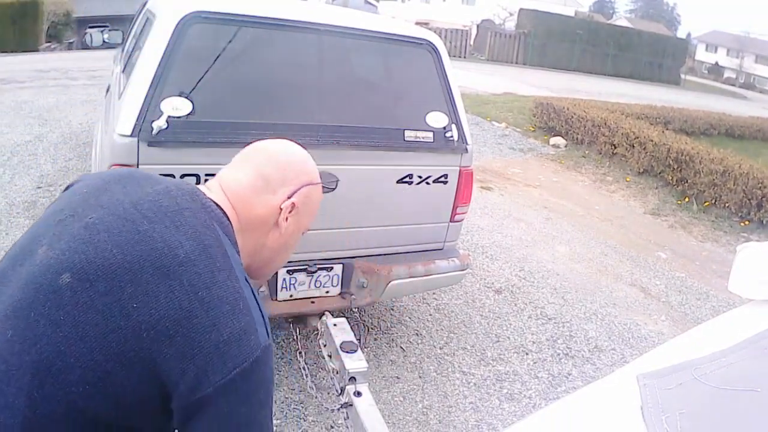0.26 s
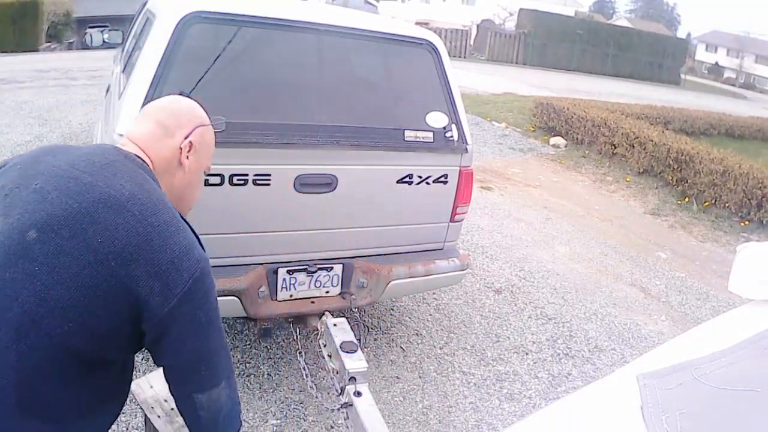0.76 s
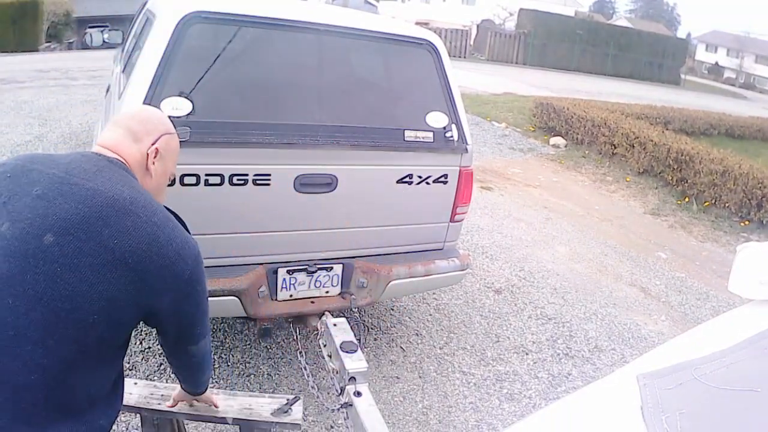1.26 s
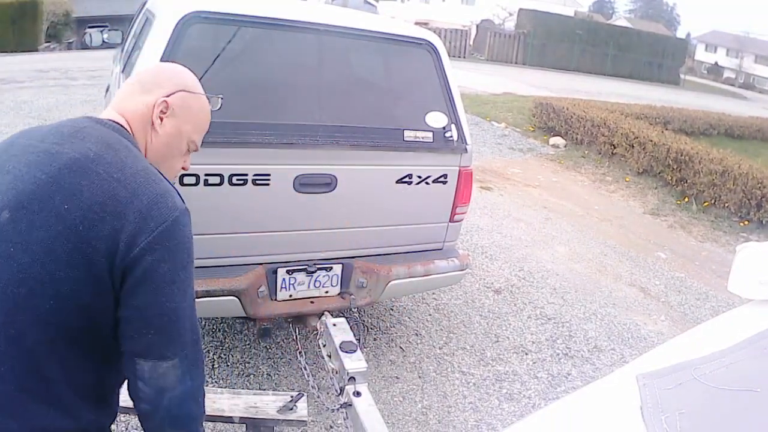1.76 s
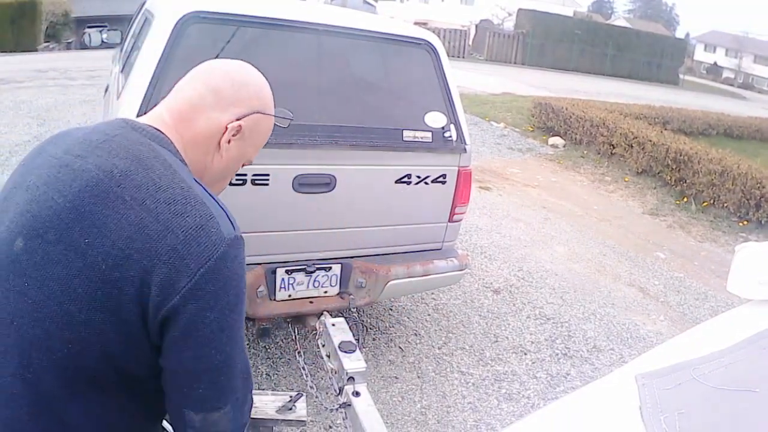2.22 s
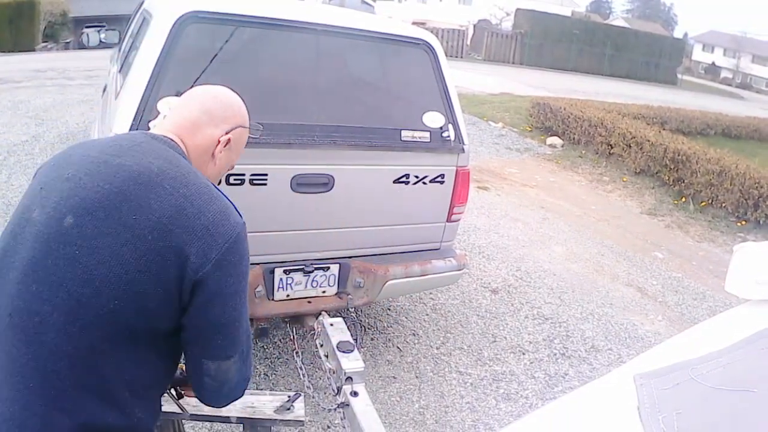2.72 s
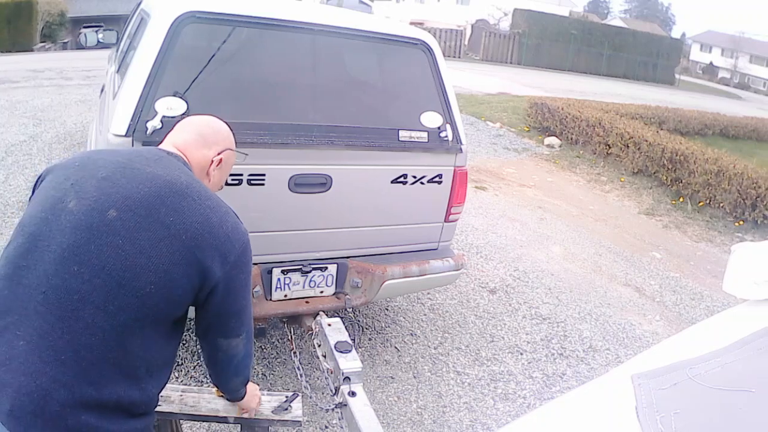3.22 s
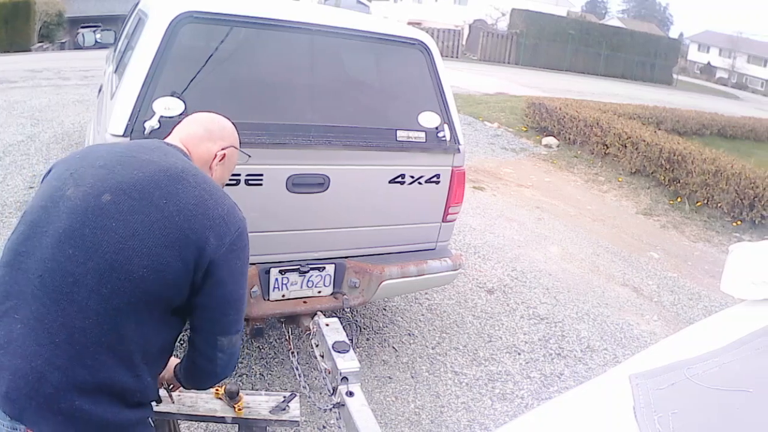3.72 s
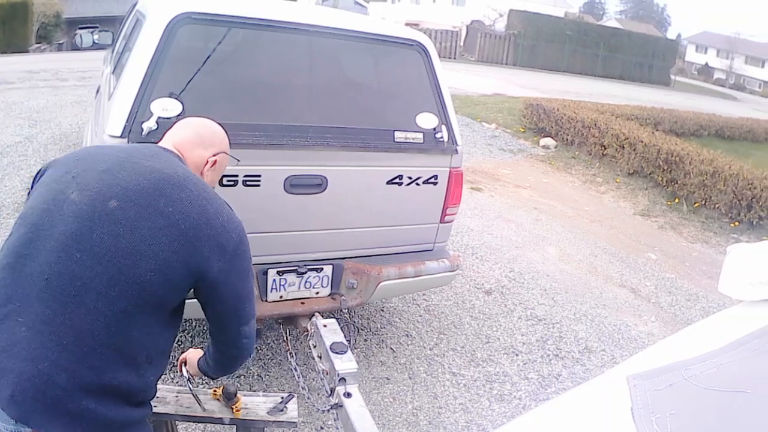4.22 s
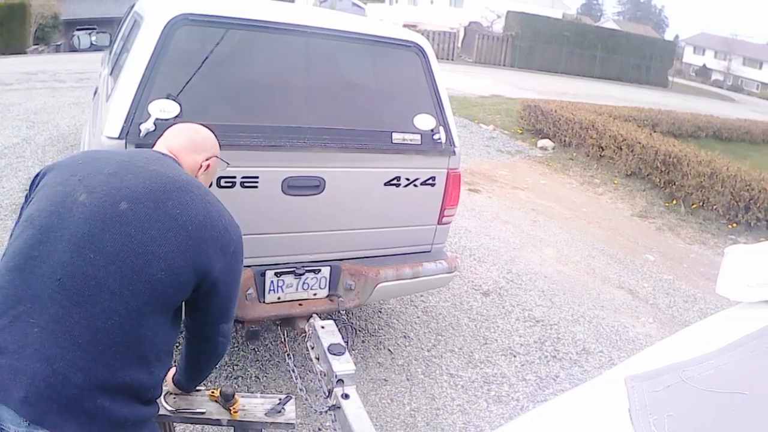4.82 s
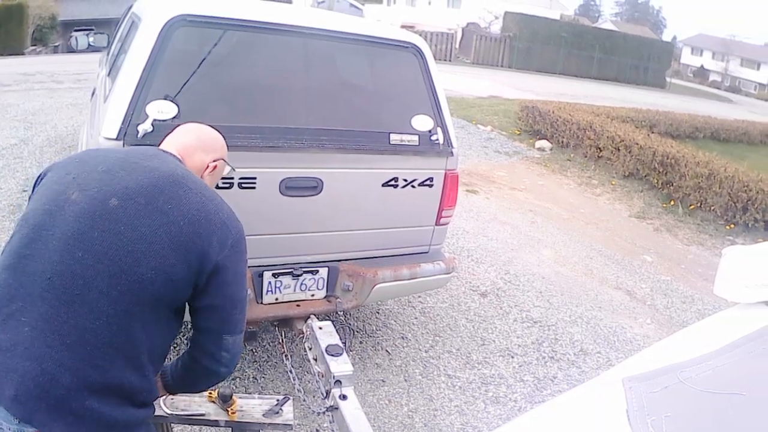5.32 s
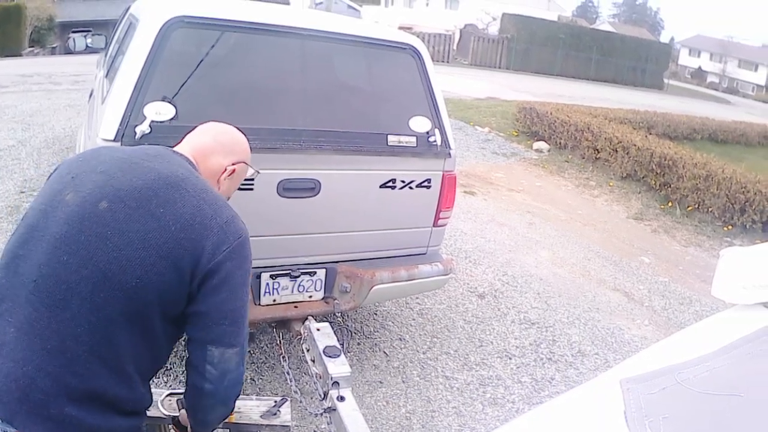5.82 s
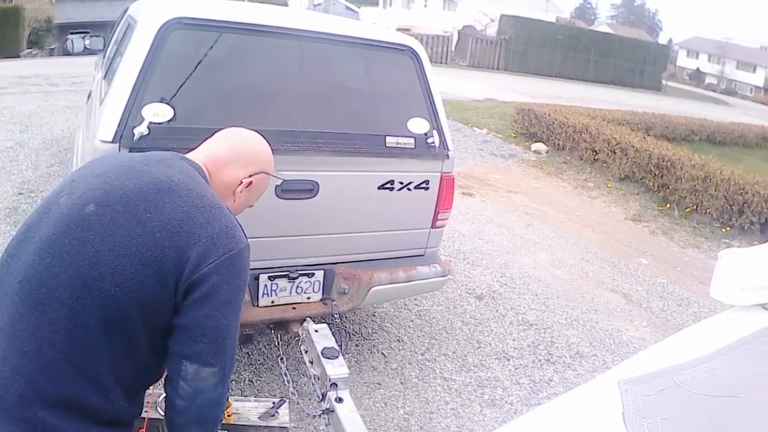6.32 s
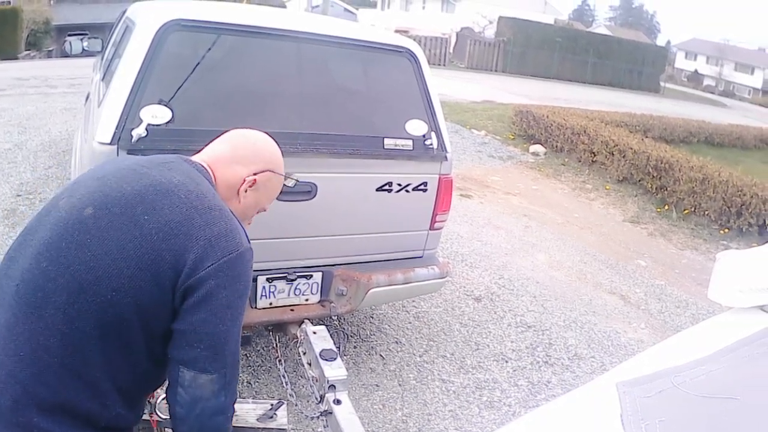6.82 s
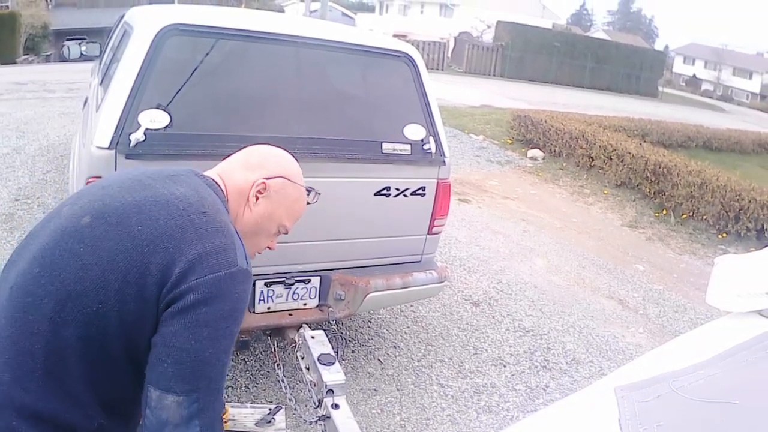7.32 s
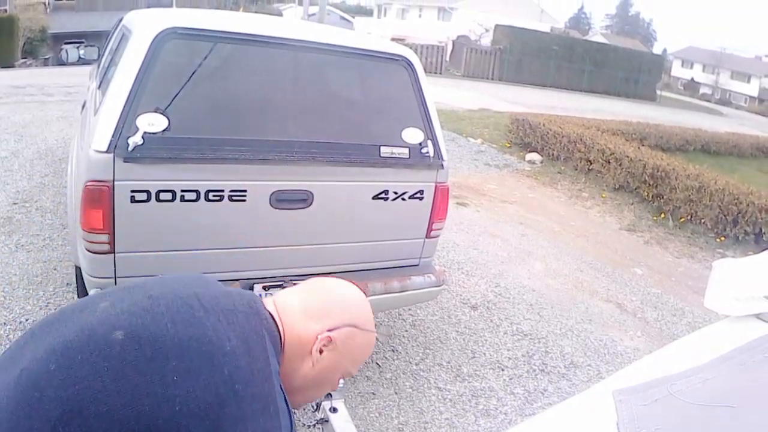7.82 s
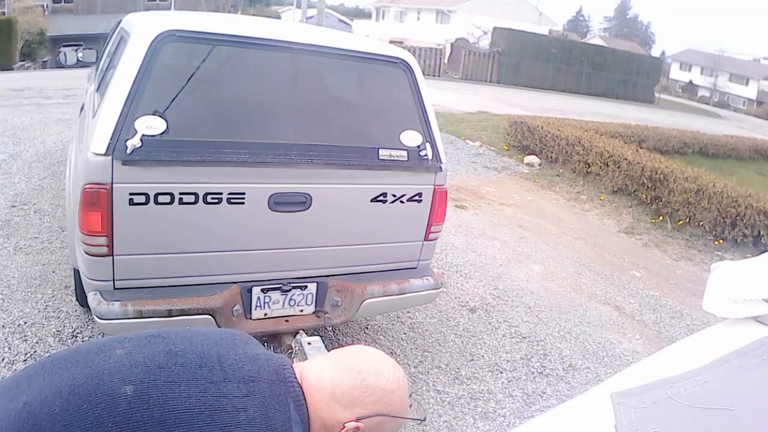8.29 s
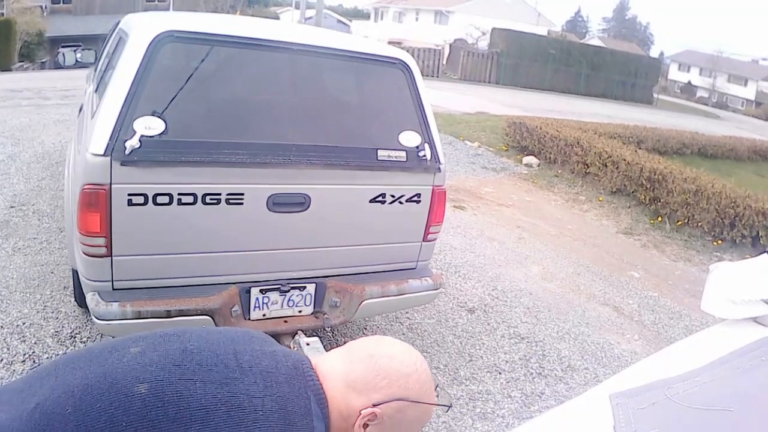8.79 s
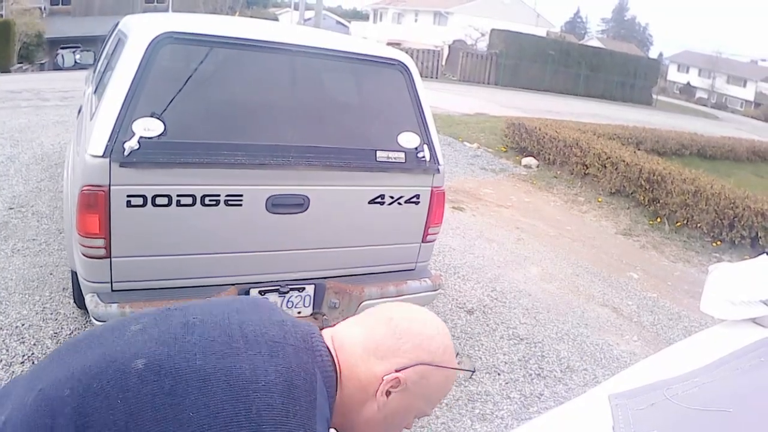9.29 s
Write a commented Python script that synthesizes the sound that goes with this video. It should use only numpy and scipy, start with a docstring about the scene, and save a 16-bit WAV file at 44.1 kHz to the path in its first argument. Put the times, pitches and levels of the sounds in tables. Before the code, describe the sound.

A man works with trailer hitch parts, heard close by on a small microphone. Woody steel knocks come in irregular clusters, with gravel drags, cloth rustle and soft footfalls between them. The hardest knock distorts midway; afterwards it is mostly quiet until a muffled chain clank and boom, then a crisp, loud coupler clank near the end. Short yard echoes, soft air hush and a distant engine fill the background.

```python
"""A gravel driveway, where a man hitches a trailer to a pickup.
Steel knocks ring the modes of a wooden trestle; the coupler and chains clank as grain noise through frame resonances.
The hitch booms and loose steel rings and tinks as modes and grains; scuffs and clothes rustle as shaped noise.
A far engine hums as two sines over a noise hush; near sounds echo off the yard.
The electronics add a faint pulsing whine, and the hardest knock overloads."""
import sys
import numpy as np
from scipy import signal
from scipy.fft import rfft, irfft
from scipy.io import wavfile
from scipy.ndimage import uniform_filter1d

SR = 44100
rng = np.random.default_rng(int(sys.argv[2]) if len(sys.argv) > 2 else 0)


def dump(signal):
    """Clip the signal to [-1, 1] and save it as 16-bit WAV at the path in sys.argv[1]."""
    limited = np.clip(np.atleast_2d(signal).T, -1, 1)
    pcm = np.round(limited * 32767).astype(np.int16)
    wavfile.write(sys.argv[1], SR, pcm)


N = 421155
TIME = np.arange(N) / SR
SHORT = TIME[:SR]  # one second: the life of one event


def from_db(db):
    """Decibels to gain."""
    return 10 ** (np.asarray(db) / 20)


def rms_one(x):
    """Scale to unit power."""
    return x / np.sqrt(np.mean(x ** 2) + 1e-20)


def at_hz(points, hz):
    """Read a spectrum on a log-frequency axis."""
    points = np.array(points)
    return np.interp(np.log(hz), np.log(points[:, 0]), points[:, 1])


def bins(x):
    """Frequencies of the spectrum of x, in Hz."""
    return np.maximum(np.fft.rfftfreq(len(x), 1 / SR), 1)


def coloured(x, spectrum):
    """EQ a noise to a spectrum; rms 1."""
    gain = from_db(at_hz(spectrum, bins(x)))
    return rms_one(irfft(rfft(x) * gain, len(x)))


def split(x, centres):
    """Overlapping bands that sum to x."""
    whole, log_hz = rfft(x), np.log(bins(x))
    bands = []
    for pick in np.eye(len(centres)):
        weight = np.interp(log_hz, np.log(centres), pick)
        bands.append(irfft(whole * weight, len(x)))
    return bands


def fade(t60):
    """Exponential decay that loses 60 dB in t60 seconds."""
    return from_db(-60 * SHORT / max(t60, 1e-3))


def swell(at, up, down):
    """A smooth rise to 1 and a smooth fall."""
    return np.exp(-((TIME - at) / np.where(TIME < at, up, down)) ** 2)


def add(out, s, sound):
    """Mix a sound in at a time in seconds."""
    start = max(round(s * SR), 0)
    out[start:start + len(sound)] += sound[:max(N - start, 0)]


def grains(spread_db):
    """A dense run of tiny contacts, a few much harder than the rest."""
    per_s = 4000  # mean density
    sizes = from_db(spread_db * np.minimum(rng.exponential(1, SR), 4))
    signs = rng.choice([-1, 1], SR)
    return sizes * signs * (rng.random(SR) < per_s / SR)


def struck(modes, favoured_hz, focus_db, octaves, length):
    """Modes ring together, neighbours in opposite sense; the place of the blow favours those near one pitch."""
    out = 0
    for k, (hz, db, t60) in enumerate(modes):
        nearness = np.exp(-(np.log2(hz / favoured_hz) / octaves) ** 2)
        level = (-1) ** k * from_db(db + focus_db * nearness)
        out = out + level * fade(t60 * length) * np.sin(2 * np.pi * hz * SHORT)
    return out / np.abs(out).max()


def burst(source, rise, t60, darkening):
    """Contacts of rms 1 swell and die away, the highs sooner than the lows; t60 holds at 1 kHz."""
    centres = np.geomspace(125, 8000, num=4)
    rise = max(rise, 1e-4)
    attack = np.minimum(SHORT / rise, 1)
    after = np.maximum(SHORT - rise, 0)
    lives = max(t60, .01) * (centres / 1000) ** -darkening
    bands = split(source, centres)
    return attack * sum(band * np.exp(-np.log(1000) * after / life) for band, life in zip(bands, lives))


def shelved(spectrum, bass_db, treble_db):
    """Tilt a colour with a bass shelf below 800 Hz and a treble shelf above 1200 Hz."""
    hinges = np.log([250, 800, 1200, 3500])
    shelf = [bass_db, 0, 0, treble_db]
    return [(hz, db + np.interp(np.log(hz), hinges, shelf)) for hz, db in spectrum]


# steel set down on wood, and its bounces:
# [t/s, peak level/dB, favoured f/Hz, contact cut-off f/Hz, rattle level against the ring/dB]
KNOCK_HITS = [(.149, -29.5, 530, 500, -16), (.2885, -32.5, 910, 1290, -4), (.4105, -26.5, 795, 1180, -9),
              (.419, -31, 866, 1000, -6), (1.101, -41.5, 1000, 1800, -1), (1.229, -15.5, 1000, 3970, -22),
              (1.377, -29, 1050, 1300, -16), (2.505, -31.5, 900, 2020, -3), (3.165, -19.5, 560, 990, -6),
              (3.3487, -8.5, 1110, 1710, -11), (3.386, -27.5, 820, 500, -17), (4.207, -29.5, 456, 740, -11),
              (4.22, -35.5, 1090, 550, -26), (4.358, -46.5, 795, 600, -11), (4.53, -36, 620, 900, -13),
              (4.772, -45, 1110, 1200, -9), (4.876, 3, 850, 3000, -14), (4.927, -21, 754, 600, -26.5),
              (4.9455, -9.5, 1200, 1200, -25), (4.9785, -19, 1090, 1380, -25),
              (6.032, -30.5, 1080, 4000, -2), (7.493, -39.5, 1150, 900, 0), (7.821, -40, 850, 1000, 5)]
# modes of steel and trestle ringing free, before focus and damping: [f/Hz, level/dB, t60/s]
TRESTLE_MODES = [(287, -29, .09), (493, -18, 0.047), (558.3, -12.5, 0.02), (580, -40, 0.61), (732, -4, .05),
                 (757, -9, .12), (848, -15, .06), (991, -1, .06), (1085, -6, .04), (1132, -5, .06),
                 (1155, -18, .03), (1180, -5, .06), (1345, -10, .045), (1432, -12, .07), (1550, -11, .05),
                 (1755, -13, .07), (1885, -11, .08), (2070, -13, .06), (2235, -17, .05),
                 (2318, -17.5, 0.074), (2730, -14.5, 0.057), (2930, -19.5, .04), (3520, -18.5, 0.054),
                 (3473, -31.5, .05), (5130, -28, 0.016), (7450, -33, .015)]
# colour of the rattle: [f/Hz, level/dB]
RATTLE_SPECTRUM = [(60, -25.5), (250, -15), (700, 7), (1500, 7), (2200, -11.5), (3600, -2), (5000, -10.5),
                   (12000, -17)]
# the softer the contact, the more one pitch stands out
FOCUS_DB, FOCUS_CONTACT_HZ, FOCUS_DB_PER_OCTAVE = 15, 1090, 9.5
KNOCK_RING = .73  # share of the free ring time that is left under the hand


def knocks(radiating_hz=230):
    """Each blow rings the trestle and rattles briefly; a soft contact dulls both and singles out one pitch."""
    out = np.zeros(N)
    ground_s, ground_db = .005, -12
    no_bass = signal.butter(3, radiating_hz, "high", fs=SR, output="sos")  # small parts radiate little bass
    for s, db, favoured_hz, contact_hz, rattle_db in KNOCK_HITS:
        focus_db = FOCUS_DB - FOCUS_DB_PER_OCTAVE * np.log2(contact_hz / FOCUS_CONTACT_HZ)
        ring = struck(TRESTLE_MODES, favoured_hz, focus_db, octaves=0.41, length=KNOCK_RING)
        chatter = coloured(grains(2.8), RATTLE_SPECTRUM)
        rattle = burst(chatter, rise=0.00094, t60=0.04, darkening=0.41)
        contact = signal.butter(1, np.clip(contact_hz, 100, 15000), fs=SR, output="sos")
        blow = signal.sosfilt(np.vstack([contact, no_bass]), ring + from_db(rattle_db) * rattle)
        ground_echo = np.interp(SHORT - ground_s, SHORT, blow, left=0)
        blow = blow + from_db(ground_db) * ground_echo
        add(out, s, from_db(db) * blow / np.abs(blow).max())
    return out


# coupler, chain and frame clanking: [t/s, rms level/dB, t60/s, treble shelf level/dB]
CLANK_HITS = [(1.217, -28.5, 0.097, -11), (1.2245, -17, 0.067, -7), (1.279, -26.5, 0.15, -9),
              (1.318, -43.5, 0.41, -2), (1.362, -44, 0.64, -3.5), (1.502, -45.5, 0.34, -10),
              (8.305, -43.5, 0.3, -23), (8.448, -29, 0.29, -19.5), (8.48, -38.5, 0.56, -32),
              (8.961, -44, .18, -4), (9.483, -31, 0.055, 2), (9.4877, -12.5, 0.089, 1.5),
              (9.4963, -10.5, .065, 4), (9.502, -19, 0.66, -9.5), (9.521, -15.5, 0.045, -12.5)]
# colour of a clank before its shelves: [f/Hz, level/dB]
CLANK_SPECTRUM = [(40, -27), (100, -14), (250, -12), (450, -10), (700, -2.5), (1000, -2), (1700, 2.5),
                  (2300, -6), (3500, -10.5), (4500, -15.5), (7000, -20), (12000, -27)]
# resonances of the trailer frame, a dip where below 0 dB: [f/Hz, width/Hz, level/dB]
FRAME_RESONANCES = [(335, 16, 2.5), (513, 49, 5.5), (685, 31, 8.5), (932, 7.3, 7.5), (1056, 21, 6),
                    (1310, 96, 3), (1750, 66, -26), (2678, 83, 7.5), (3460, 34, 14), (5330, 29, 15.5)]
CLANK_RISE_S, RISE_DOUBLES_DB = 0.0024, 26  # rise at 0 dB treble; it doubles per 26 dB duller
# bass at 0 dB level and treble; it grows with force and falls with hardness (dB per dB)
CLANK_BASS_DB, BASS_PER_LEVEL, BASS_PER_TREBLE = 7.5, 0.36, 0.78


def clanks():
    """Loose steel chatters in a quick burst that excites the resonances of the frame."""
    out, hz = np.zeros(N), bins(SHORT)
    frame = 1 + sum((from_db(db) - 1) / (1 + 2j * (hz - centre) / width)
                    for centre, width, db in FRAME_RESONANCES)
    for s, db, t60, treble_db in CLANK_HITS:
        bass_db = CLANK_BASS_DB + BASS_PER_LEVEL * db - BASS_PER_TREBLE * treble_db
        rise = CLANK_RISE_S * 2 ** (-treble_db / RISE_DOUBLES_DB)
        resonant = irfft(rfft(grains(3.84)) * frame)
        chatter = coloured(resonant, shelved(CLANK_SPECTRUM, bass_db, treble_db))
        add(out, s, from_db(db) * burst(chatter, rise, t60, darkening=0.32))
    return out


# the hitch is jolted and booms: [t/s, peak level/dB]
HITCH_JOLTS = [(8.456, -24.5), (9.491, -40)]
# modes of the hitch, before focus and shortening: [f/Hz, level/dB, t60/s]
HITCH_MODES = [(83, -1, 0.65), (251.3, -2, 0.41), (338, -0.5, 0.53), (905, 6, 0.18), (1780, -12, 0.13)]


def booms():
    """A heavy jolt sets the long, low modes of the hitch ringing."""
    out = np.zeros(N)
    for s, db in HITCH_JOLTS:
        boom = struck(HITCH_MODES, favoured_hz=335, focus_db=4.5, octaves=.5, length=0.86)
        add(out, s, from_db(db) * boom)
    return out


# thin high rings of loose steel, touched lightly or jarred by a hard knock:
# [t/s, peak level/dB, favoured f/Hz, ring length as a multiple]
STEEL_RINGS = [(2.802, -45, 4130, 1.6), (2.885, -56, 2300, 5.6), (3.924, -40, 2300, 0.66),
               (4.876, -40, 4200, 0.74)]
# modes of the loose steel, before focus and ring length: [f/Hz, level/dB, t60/s]
STEEL_MODES = [(2035, -9, .15), (2200, 0, .12), (4645, -3, .19), (5286, -6, .08)]
# small metallic tinks, ticks and jingles of loose steel: [t/s, rms level/dB, t60/s, pitch f/Hz]
STEEL_TINKS = [(1.33, -42.5, 0.48, 1030), (1.375, -48, 0.14, 3720), (1.401, -48, 0.061, 4500),
               (1.474, -39, 0.062, 1167), (2.538, -44, 0.074, 4240), (2.801, -43, 0.064, 2000),
               (4.9, -33, 0.19, 2250), (4.95, -47, 0.32, 2090), (6.914, -40, .11, 1470),
               (6.915, -46, .07, 2450), (8.368, -42.5, 0.033, 1740), (8.45, -46.5, 0.15, 2700),
               (8.962, -47, 0.093, 1890), (8.98, -49.5, 0.25, 1410)]
# colour of the tinks: [f as a multiple of the pitch, level/dB]
TINK_SPECTRUM = [(.15, -40), (.6, 0.5), (.85, -0.5), (1.049, 7), (1.3, -15), (1.8, -19.5), (4.001, -44.5)]
TINK_RISE_SHARE = .035  # of the decay time


def loose_steel():
    """Loose steel rings thinly in a few high modes, and tinks, ticks and jingles as grains around a pitch."""
    out = np.zeros(N)
    for s, db, favoured_hz, length in STEEL_RINGS:
        ring = struck(STEEL_MODES, favoured_hz, focus_db=13.5, octaves=0.36, length=length)
        add(out, s, from_db(db) * ring)
    for s, db, t60, hz in STEEL_TINKS:
        tink = coloured(grains(3.0), np.array(TINK_SPECTRUM) * [hz, 1])
        add(out, s, from_db(db) * burst(tink, TINK_RISE_SHARE * t60, t60, darkening=0.2007))
    return out


# colour shared by drags and scuffs, before its shelves: [f/Hz, level/dB]
SCUFF_SPECTRUM = [(60, -32), (200, -13.5), (500, 4), (950, 7), (1400, 2), (2300, -10.5), (3600, -12.5),
                  (5000, -27), (12000, -31)]


def grinding(rise, t60, bass_db, treble_db):
    """Rough surfaces grind under a load: widely uneven grains in one burst."""
    contacts = coloured(grains(5.0), shelved(SCUFF_SPECTRUM, bass_db, treble_db))
    return burst(contacts, rise, t60, darkening=0.034)


# shoes and wood drag over the gravel: [t/s, rms level/dB, t60/s, treble shelf level/dB]
GRAVEL_DRAGS = [(.083, -43.5, 0.34, -3), (.132, -42, 0.12, -7), (0.319, -40.5, 0.58, -5.5),
                (.393, -34.5, 0.11, -26), (0.651, -47.5, 0.22, -1), (1.674, -49, 0.27, -5),
                (1.912, -46.5, 0.23, -4), (2.434, -46.5, .3, -3)]
# crunches of grit, and scuffs of steel handled on the trestle; some die quickly, some linger:
# [t/s, rms level/dB, t60/s]
SCUFF_HITS = [(.197, -46.5, 0.055), (1.155, -51.5, 0.84), (1.628, -48.5, 0.4), (2.045, -51.5, 1),
              (2.134, -49, .2), (2.171, -51, 0.3), (2.672, -39.5, .14), (2.721, -41, 0.088),
              (2.824, -43.5, 0.23), (2.969, -42, 0.05), (6.011, -46.5, 0.11), (6.069, -50, 0.22),
              (6.18, -49.5, 0.083), (6.26, -54, .1), (6.84, -52.5, 0.23), (7.412, -43.5, 0.15),
              (7.533, -50, .17), (7.571, -45, 0.037), (7.629, -49.5, 0.19), (7.662, -50, 0.17),
              (9.295, -47, 0.2)]
# soft footfalls: [t/s, rms level/dB, t60/s]
FOOT_THUDS = [(2.226, -45.5, 0.11), (2.285, -45, 0.16), (2.53, -54, 0.073), (2.655, -51, 0.065),
              (7.196, -40, 0.13), (7.392, -41, 0.24), (8.454, -42.5, 0.59)]
# colour of a footfall: [f/Hz, level/dB]
THUD_SPECTRUM = [(25, -6), (50, 1.5), (100, 0.5), (230, -6.5), (330, -12), (600, -44), (3000, -60)]
DRAG_RISE_S, DRAG_BASS_DB = 0.021, 5.5
SCUFF_RISE_S, SCUFF_BASS_DB, SCUFF_TREBLE_DB = 0.0029, -2.5, 0.5
THUD_RISE_S = 0.0046


def scuffs_and_steps():
    """Drags swell slowly, grit and handled steel scuff almost at once, and footfalls land with a dull thud."""
    out = np.zeros(N)
    for s, db, t60, treble_db in GRAVEL_DRAGS:
        add(out, s, from_db(db) * grinding(DRAG_RISE_S, t60, DRAG_BASS_DB, treble_db))
    for s, db, t60 in SCUFF_HITS:
        add(out, s, from_db(db) * grinding(SCUFF_RISE_S, t60, SCUFF_BASS_DB, SCUFF_TREBLE_DB))
    for s, db, t60 in FOOT_THUDS:
        footfall = coloured(rng.standard_normal(SR), THUD_SPECTRUM)
        add(out, s, from_db(db) * burst(footfall, THUD_RISE_S, t60, darkening=0.18))
    return out


# the man bends, reaches or straightens up: [t/s at the height of the move, level/dB, swell/s, ebb/s]
BODY_MOVES = [(.6, -60, 1, 0.28), (1.71, -56, 0.14, .05), (1.95, -55.5, 0.028, 0.097),
              (2.54, -47, 0.17, 0.2), (3.15, -62.5, 0.43, .3), (6.3, -66.5, .08, .15),
              (7.55, -56, 0.24, 0.16), (8.4, -53.5, 0.11, 0.21), (8.86, -57, 0.3, 0.17),
              (9.36, -54.5, 0.12, 0.12)]
# colour of the cloth: [f/Hz, level/dB]
CLOTH_SPECTRUM = [(25, -22.5), (60, -3), (180, 1.5), (300, -1), (600, -10), (1500, -15.5), (4000, -34.5),
                  (12000, -51.5)]
STILL_DB = -67.5  # his clothes while he works on the spot


def rustle(flutter_db=3.0):
    """Cloth rubs unevenly, swelling and ebbing with each move of the man."""
    power = from_db(STILL_DB) ** 2
    for s, db, up, down in BODY_MOVES:
        power = power + (from_db(db) * swell(s, up, down)) ** 2
    flutter = rms_one(uniform_filter1d(rng.standard_normal(N), size=700))
    cloth = coloured(rng.standard_normal(N), CLOTH_SPECTRUM)
    return np.sqrt(power) * from_db(flutter_db * flutter) * cloth


# colour of the outdoor hush: [f/Hz, level/dB per Hz]
HUSH_SPECTRUM = [(25, -13), (50, -7.5), (100, -4), (240, -3), (450, -6), (850, -3.5), (1250, -10.5),
                 (2000, -18), (3200, -20.5), (5000, -23), (12500, -24)]
HUSH_DB = -58.5  # rms
# the engine idles and speeds up once; level follows speed
IDLE_HZ, IDLE_DB = 101.8, -68.5
REV_AT_S, REV_UP_S, REV_DOWN_S, REV_HZ, ENGINE_DB_PER_HZ = 5.4, 0.97, 2.1, 5.4, 0.97


def distance(octave_db=-8, unsteady=.005):
    """The wavering firing note of a far engine and its octave, over the steady outdoor hush."""
    faster_hz = REV_HZ * swell(REV_AT_S, REV_UP_S, REV_DOWN_S)
    waver = rms_one(uniform_filter1d(rng.standard_normal(N), size=4000))
    phase = 2 * np.pi * np.cumsum((IDLE_HZ + faster_hz) * (1 + unsteady * waver)) / SR
    note = np.sin(phase) + from_db(octave_db) * np.sin(2 * phase)
    hum = np.sqrt(2) * from_db(IDLE_DB + ENGINE_DB_PER_HZ * faster_hz) * note  # root 2: sine peak from rms
    hush = from_db(HUSH_DB) * coloured(rng.standard_normal(N), HUSH_SPECTRUM)
    return hum + hush


# echoes from truck, trailer and yard, levels on white noise: [band centre f/Hz, level/dB, t60/s]
YARD_ECHOES = [(202.1, -22.5, 0.38), (500, -15.5, 0.413), (1001, -15.5, .33), (2211, -16.5, 0.33),
               (4426, -16, 0.36), (10000, -27, .1)]


def yard(x):
    """Scattered echoes build up and die away band by band."""
    build_up_s = .016
    bands = split(rng.standard_normal(SR), [hz for hz, db, t60 in YARD_ECHOES])
    echoes = 0
    for band, (hz, db, t60) in zip(bands, YARD_ECHOES):
        decay = fade(t60)
        echoes = echoes + from_db(db) * band * decay / np.linalg.norm(decay)
    build_up = np.minimum(SHORT / build_up_s, 1) ** 2
    return signal.fftconvolve(x, echoes * build_up)[:N]


def scene():
    """All near sounds but the rustle share the echoes of the yard."""
    near = knocks() + clanks() + booms() + scuffs_and_steps() + loose_steel()
    return (near + yard(near) + rustle() + distance())[None]


CUTOFF_HZ = 12800


def record(dry, whine_db=-70):
    """The electronics whine in 30 pulses a second; peaks overload; the top is cut."""
    gate = np.maximum(np.cos(2 * np.pi * 30 * TIME), 0)
    whine = from_db(whine_db) * gate * np.sin(2 * np.pi * 6060 * TIME)
    overloaded = np.clip(dry + whine, -1, 1)
    top_cut = signal.ellip(10, .1, 70, CUTOFF_HZ, fs=SR, output="sos")
    return signal.sosfilt(top_cut, overloaded)


dry = scene()
out = record(dry)
dump(out)
```